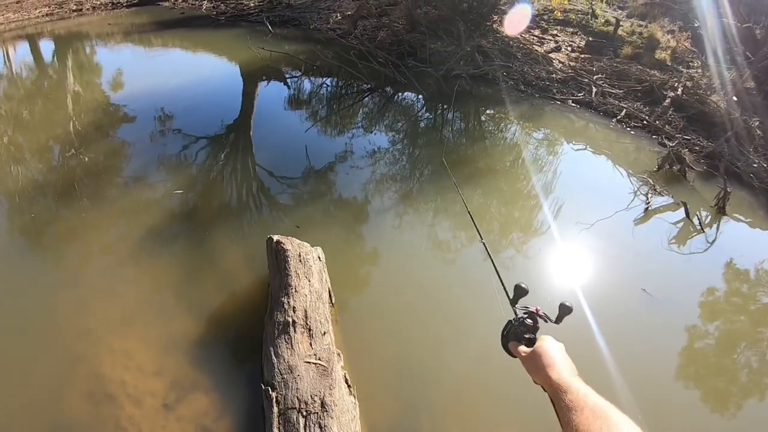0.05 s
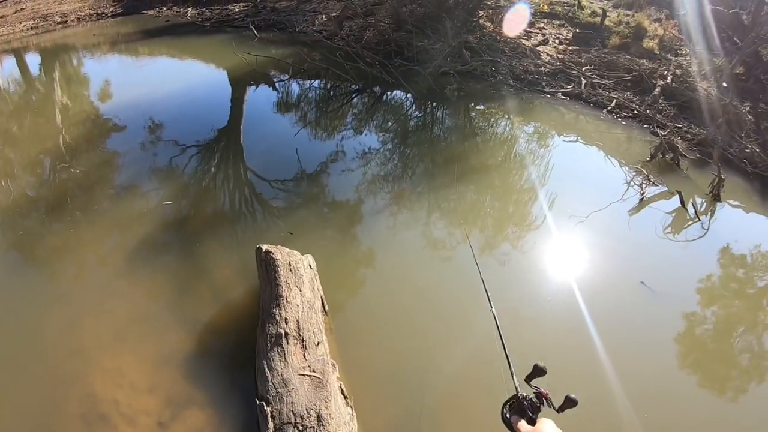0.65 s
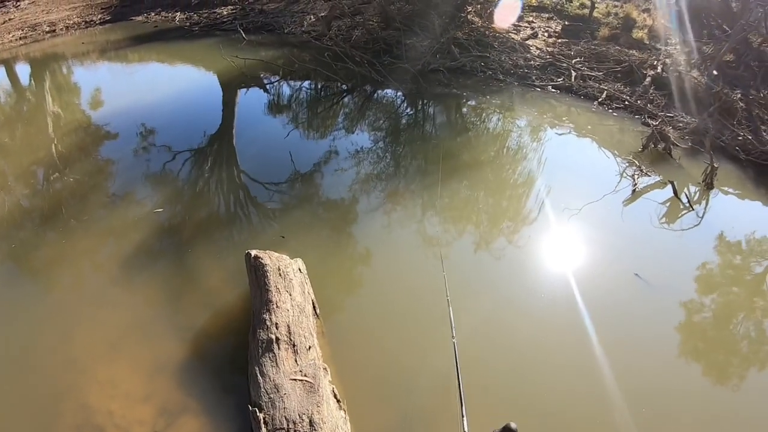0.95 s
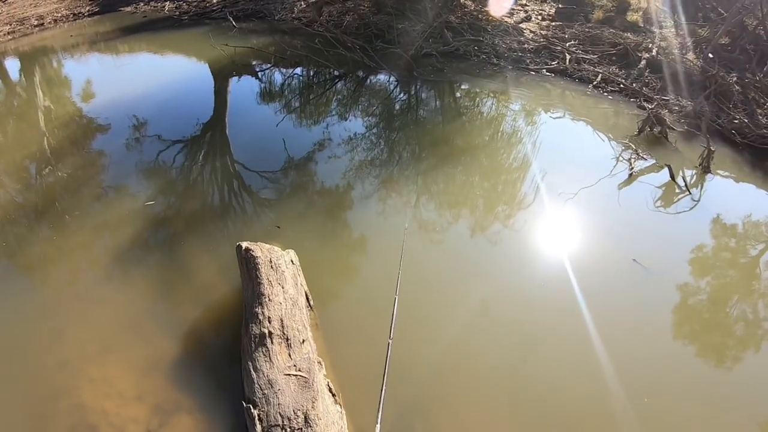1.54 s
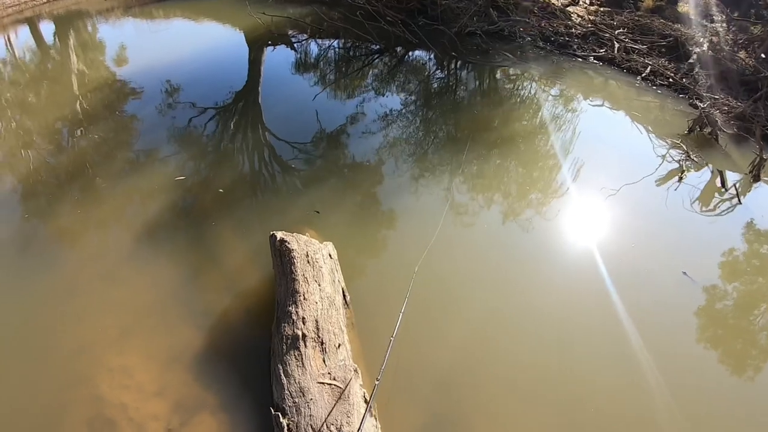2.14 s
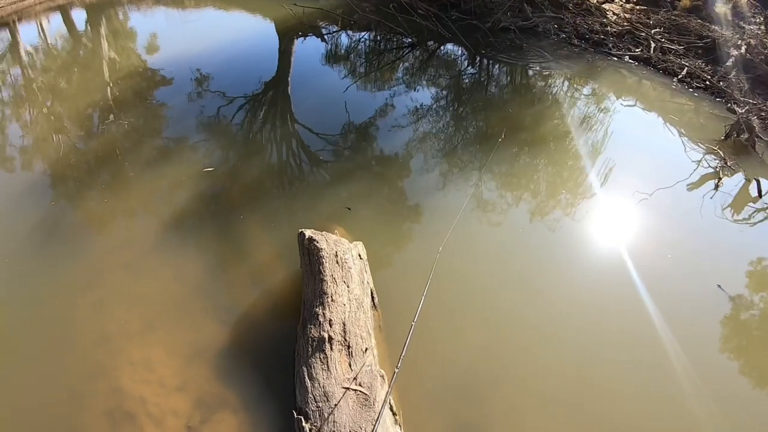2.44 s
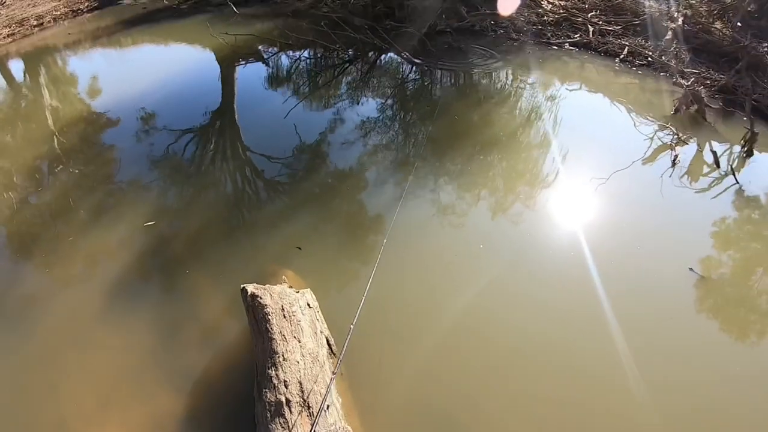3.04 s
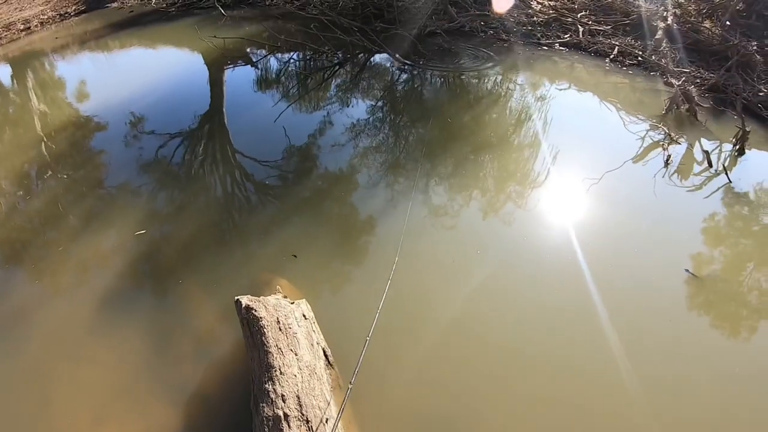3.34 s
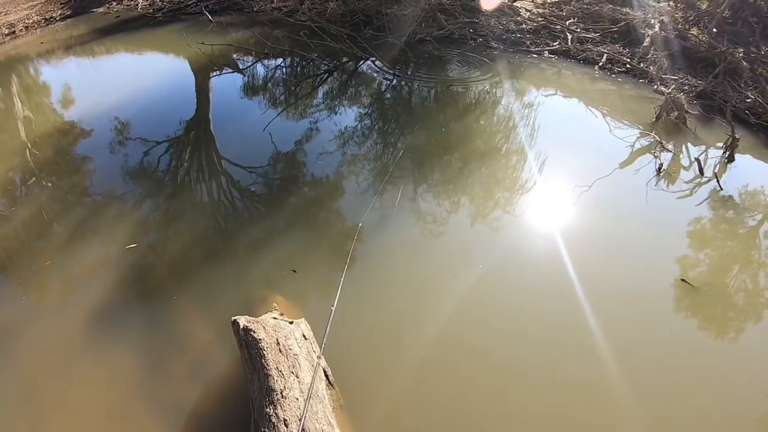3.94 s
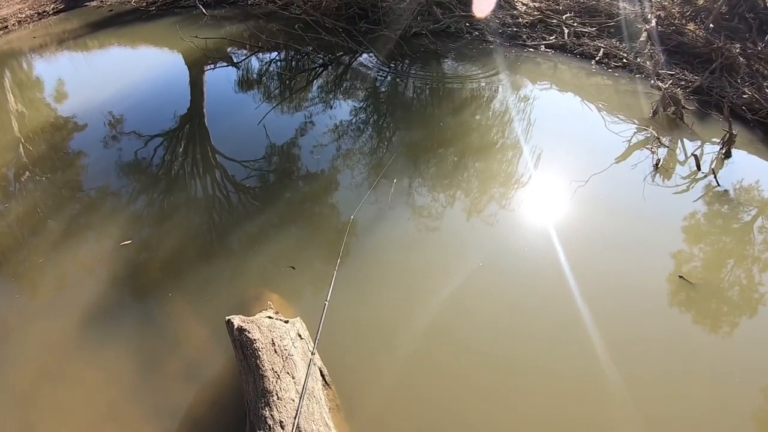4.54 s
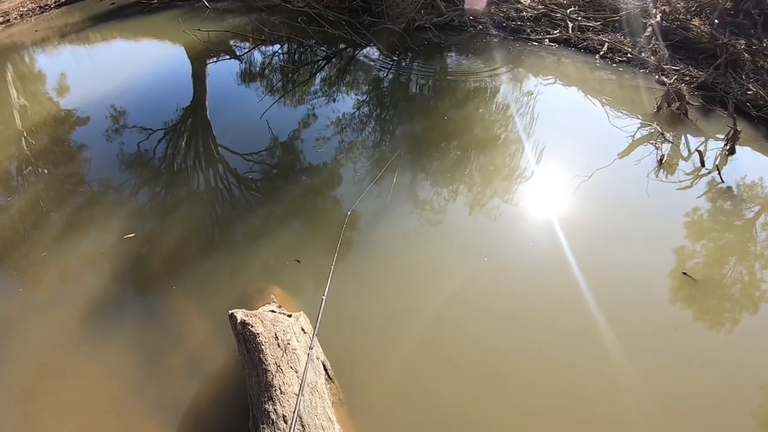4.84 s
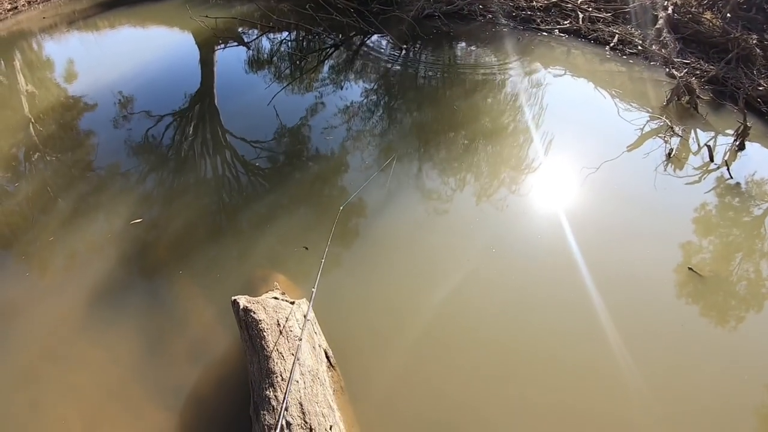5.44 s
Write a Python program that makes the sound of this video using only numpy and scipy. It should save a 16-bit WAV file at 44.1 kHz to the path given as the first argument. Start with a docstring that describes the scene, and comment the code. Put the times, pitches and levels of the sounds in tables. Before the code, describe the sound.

Raspy cockatoo-like screeches echo among riverside trees, with a soft plop in the water and one close snap of a fishing reel.

```python
"""Two harsh birds, most likely cockatoos, screech in turn over a still river, ahead and to the left.
Each screech is a train of uneven pulses in a throat with a few broad resonances.
First a far call falls away on the right and a lure plops into the water; later, close to the
microphones, the angler's reel snaps into gear. The near bank scatters the sound and the trees ring
with it, over soft handling bumps, a brief low hum and the faint wash of the bush."""
import sys
import numpy as np
from scipy import signal
from scipy.fft import rfft, irfft
from scipy.io import wavfile
from scipy.ndimage import map_coordinates

SR = 44100
rng = np.random.default_rng(int(sys.argv[2]) if len(sys.argv) > 2 else 0)


def unload_wav(signal):
    """Save mono or channel-first audio to the path in sys.argv[1] as 16-bit WAV at rate SR, clipped to [-1, 1]."""
    wavfile.write(
        sys.argv[1],
        SR,
        np.round(np.clip(np.atleast_2d(signal).T, -1, 1) * 32767).astype(np.int16),
    )


N = 250488

# One screech a row: start_s, length_s, attack_s, level_db, swell_db, rasp_db, upper_db, resonance_ratio,
# scoop_share, open_s, strain_peak_s, strain_db, fizz_db, whistle_hz, whistle_db, left_db
SCREECHES = [ (0.756, 0.62, 0.074, -24, 3.5, -7.5, 4, 1.02, 0.15, 0.089, 0.22, 5.5, -3, 2236, -0.5, -1),
             (1.505, 0.57, 0.2, -24.5, 3.5, -8.5, 1.5, 1.022, 0.14, 0.095, 0.28, 0.5, -2.5, 2220, -4.5, 0),
             (2.287, 0.56, 0.12, -22.5, 1, -10, 6, 0.98, 0.07, 0.08, 0.27, 4, -4, 2220, -6.5, 2.5),
             (3.025, 0.388, 0.18, -25.5, -3, -8, 3, 1.006, 0.1, 0.1, 0.25, 8, -3, 2240, -9.5, -0.5),
             (3.458, 0.43, 0.034, -28.5, 2, -9, 2.5, 1.013, 0.08, 0.049, 0.27, 2, -7.5, 2275, -15.5, 3),
             (3.752, 0.25, 0.087, -31.5, -2.5, -9.5, -3, 1.04, 0.05, 0.053, 0.093, -1, -0.5, 2180, -8, -1.5),
             (3.946, 0.120, 0.038, -26.5, 1, -11, 5.5, 1.02, 0.01, 0.031, 0.06, -3, -2.5, 2170, -3.5, -1),
             (4.019, 0.195, 0.039, -26.5, 4.5, -8.5, -4, 1.0, 0, 0.03, 0.13, -2, 0, 2120, -2.5, 0.5),
             (4.199, 0.35, 0.024, -28, 6.5, -10.5, 7, 1.034, 0.11, 0.033, 0.36, 4.5, -7, 2150, -11, 3.5),
             (4.45, 0.51, 0.084, -27, 3, -9.5, 3, 0.99, 0.04, 0.084, 0.27, 1.5, 1, 2150, -6, 1.5),
             (5.201, 0.56, 0.062, -27, 4.5, -9.5, 2.5, 0.98, 0.09, 0.062, 0.36, 1, -2.5, 2300, -11.5, 3.5),
             ]
def cockatoos():
    """Two birds trade screeches, one ahead of the microphones and one to the left."""
    out = np.zeros((2, N))
    for start_s, *shape, left_db in SCREECHES:
        for channel, sound in zip(out, at_microphones(screech(start_s, *shape), left_db)):
            add(channel, start_s, sound)
    return out


# The throat's broad resonances, before the beak shifts them: frequency_hz, level_db
THROAT = [(150, -65.5), (250, -37.5), (357, -37), (518, -28.5), (586, -30), (717, -26), (918, -21),
          (1090, -11.5), (1370, -15.5), (1650, -15.5), (1820, -13.5), (2090, -2.5), (2220, -0.5),
          (2630, -6), (3070, -3), (3640, -12.5), (4260, -8.5), (4820, -15.5), (5620, -16), (8950, -30),
          (10100, -40), (13200, -73.5), (22000, -120)]
def screech(start_s, length_s, attack_s, level_db, swell_db, rasp_db, upper_db, resonance_ratio,
            scoop_share, open_s, strain_peak_s, strain_db, fizz_db, whistle_hz, whistle_db,
            strain_width_s=0.21, close_s=0.04, droop_share=0.13, release_s=0.053, flutter_hz=16.07):
    """Resonances rise as the beak opens and sink as it shuts; mid-call strain adds brightness and rasp."""
    t = np.arange(0, length_s, 1 / SR)
    remaining_s = length_s - t
    slack_db = strain_db * (np.exp(-((t - strain_peak_s) / strain_width_s) ** 2) - 1)
    shut = scoop_share * np.exp(-t / open_s) + droop_share * np.exp(-remaining_s / close_s)
    pulses = syrinx(start_s + t)
    voice = coloured(pulses, THROAT) + gain_of(-65) * pulses
    # A nasal resonance and a fading whistle both ring more behind a shut beak.
    voice += gain_of(-15.5 + 26.5 * shut) * resonance(voice, hz=1100, width_hz=100)
    voice += gain_of(whistle_db - 11 * t + 26.5 * shut) * resonance(voice, whistle_hz, width_hz=194)
    speed = resonance_ratio - shut + 0.022 * drift(len(t), hz=14)
    voice = map_coordinates(voice, [np.cumsum(speed)], order=3, mode="mirror")  # all resonances move
    low = lowpass(voice, 2413, order=6)
    body = lowpass(voice, 3307, order=6)
    bright = lowpass(voice, 4900, order=3)
    # A shut beak muffles the upper resonance and the rasp; strain and effort are never quite steady.
    upper_gain = gain_of(upper_db + slack_db - 31 * shut + 1.3 * drift(len(t), flutter_hz))
    core = (unit_rms(low) + upper_gain * unit_rms(body - low)) / np.hypot(1, upper_gain)
    rasp = unit_rms(bright - body + gain_of(fizz_db) * (voice - bright))
    rasp *= gain_of(rasp_db + 0.31 * slack_db - 13 * shut + 1.3 * drift(len(t), flutter_hz))
    effort_db = level_db + swell_db * (t / length_s - 0.5) + 0.33 * slack_db
    effort_db -= 0.18 * drift(len(t), flutter_hz)
    fade = np.minimum(t / attack_s, 1) ** 0.74 * np.minimum(remaining_s / release_s, 1)
    return gain_of(effort_db) * fade * (core + rasp)


# The last screech locks into a clear note: time_s, pitch_hz, clear_share
CLEAR_NOTE = [(5.576, 457, 0.4), (5.614, 468.7, 0.73), (5.635, 467, 0.3), (5.659, 478, 0.55),
              (5.68, 468, 0.45)]
def syrinx(t, slap_hz=245, jitter=0.42, uneven_db=-0.5, steady_air=9.7):
    """Membranes slap unevenly, with air rushing between them, and briefly lock to a pitch."""
    haste = np.exp(jitter * drift(len(t), hz=300))
    cycles = np.cumsum(slap_hz * haste) / SR
    size = gain_of(uneven_db * np.clip(rng.standard_normal(len(t)), -2, 2))
    size /= np.sqrt(haste)  # pressure builds in a long gap
    slaps = np.diff(np.floor(cycles), prepend=0) * size
    air = (steady_air + np.exp(-2 * (cycles % 1))) * rng.standard_normal(len(t))
    harsh = unit_rms(unit_rms(slaps - slaps.mean()) + unit_rms(air))
    time_s, pitch_hz, clear_share = np.transpose(CLEAR_NOTE)
    clear = np.interp(t, time_s, clear_share, left=0)
    phase = 2 * np.pi * np.cumsum(np.interp(t, time_s, pitch_hz)) / SR
    note = sum(np.cos(k * phase) for k in range(1, 14)) * 2 * np.sqrt(pitch_hz.mean() / SR)
    return np.sqrt(1 - clear) * harsh + np.sqrt(clear) * note


def at_microphones(x, left_db, lag_samples_per_db=0.1957):
    """The nearer microphone hears the caller louder and a fraction of a sample sooner."""
    n = np.arange(len(x))
    return [gain_of(db) * map_coordinates(x, [n + lag_samples_per_db * db], order=3)
            for db in (left_db / 2, -left_db / 2)]


# The reel's ticks, then its snap into gear: start_s, level_db, treble_db
REEL_TICKS = [(0.030, -42, -9), (0.037, -37, 1), (0.053, -36, 11), (0.076, -46, 4), (0.234, -40, 7),
              (0.335, -42, 2), (0.353, -43, 4), (0.373, -44, 6), (2.2576, -23.5, -12), (2.2626, -15, 8),
              (2.2635, -16, 8), (2.2643, -11.5, 0), (2.2687, -20, -19), (2.2696, -19, -14)]
# Modes of its body: frequency_hz, level_db, t60_s
REEL_MODES = [(895, -7, 0.006), (1650, -6.5, 0.008), (2560, -2, 0.006), (3230, -3.5, 0.013),
              (4140, -6, 0.0055), (5700, -0.5, 0.0049), (6820, -2.5, 0.0046), (8620, -2.5, 0.0053),
              (11800, -30, 0.0036)]
# The scrape in each strike: frequency_hz, level_db
REEL_GRIT = [(100, 0), (800, 4), (3000, 2.5), (9000, -2), (11000, -14), (15000, -11)]
def reel(left_db=-4.5, hard_tick_db=-12, grit_decay_s=0.00075):
    """Pawl and gears strike a small, damped body, so close that each microphone hears its own grit."""
    out, t = np.zeros((2, N)), np.arange(SR // 20) / SR
    for start_s, level_db, treble_db in REEL_TICKS:
        ring = np.zeros(len(t))
        for hz, mode_db, t60_s in REEL_MODES:
            decay = gain_of(mode_db + treble_db * (hz > 5000) - 60 * t / t60_s)
            ring += rng.choice([-1, 1]) * decay * np.sin(2 * np.pi * hz * t)
        # Soft ticks carry less grit.
        grit_gain = 0.83 * gain_of(min(treble_db, 0) + 0.3 * (level_db - hard_tick_db))
        for channel in out:
            grit = coloured(rng.standard_normal(len(t)) * np.exp(-t / grit_decay_s), REEL_GRIT)
            add(channel, start_s, gain_of(level_db) * (ring / abs(ring).max() + grit_gain * grit))
    return panned(lowpass(out, 12000) - lowpass(out, 680), left_db)


# The lure landing in the river: start_s, level_db, pitch_hz, rise_per_s, t60_s, spray_gain
SPLASHES = [(0.418, -47, 3550, 1, 0.026, 1), (0.426, -45, 3090, 4, 0.05, 1),
            (0.441, -57, 1310, 5, 0.047, 0.58), (0.448, -49, 3540, -6, 0.075, 0.76),
            (0.457, -50.5, 1271, 5, 0.034, 0.8), (0.480, -49, 1516, 5, 0.022, 0.76),
            (0.483, -42, 720, -4, 0.066, 0.65), (0.49, -46, 2300, 4, 0.025, 0.4),
            (0.499, -38.5, 2620, 11, 0.018, 0.35), (0.51, -50, 1420, 18.5, 0.047, 0.2),
            (0.525, -50, 1950, 45, 0.04, 0.1), (0.575, -63, 2690, 11, 0.015, 0.7),
            (0.629, -48, 3200, 70, 0.029, 0.22), (0.673, -50.5, 1200, 30, 0.055, 0.45),
            (0.683, -49, 2300, 72.5, 0.04, 0), (0.688, -48, 1880, 6, 0.035, 0.5),
            (0.708, -45, 760, 6, 0.02, 0.04), (0.726, -50, 3070, 4, 0.024, 0.17)]
def lure(droplets_per_s=1500, spray_t60_s=0.057, attack_s=0.00063):
    """Each splash is a short-lived bubble that glides in pitch, with a brief spatter of droplets."""
    out, t = np.zeros(N), np.arange(SR // 16) / SR
    onset = 1 - np.exp(-t / attack_s)
    for start_s, level_db, pitch_hz, rise_per_s, t60_s, spray_gain in SPLASHES:
        bubble = np.sin(2 * np.pi * pitch_hz * (t + rise_per_s * t ** 2 / 2)) * gain_of(-60 * t / t60_s)
        droplets = rng.standard_normal(len(t)) * (rng.random(len(t)) < droplets_per_s / SR)
        spectrum = [(pitch_hz / 3, -20), (pitch_hz, 0), (5800, -8), (11000, -30), (16000, -45)]
        spatter = unit_rms(coloured(droplets, spectrum)) * gain_of(-60 * t / spray_t60_s)
        add(out, start_s, gain_of(level_db) * (bubble + spray_gain * spatter) * onset)
    return lowpass(out, 13000)


# The far bird's falling call: time_s, pitch_hz, level_db
FAR_CALL = [(0, 1250, -58), (.06, 1233, -55), (0.121, 1176, -58), (0.18, 1053, -52.5), (0.244, 1022, -50.5),
            (.28, 958, -61)]
# Its hoarseness, heard at a distance: frequency_hz, level_db
FAR_HOARSENESS = [(350, -62), (600, -30), (1080, -29.5), (1570, -21.5), (1720, -12.5), (2620, -15),
                  (3510, -20.5), (9000, -42.5), (11700, -74), (19800, -120)]
def far_bird(note_db=-5, waver=0.013, left_db=-6, release_s=0.012):
    """A hoarse cry far off to the right, with a falling note in it that gives way to its octave."""
    time_s, pitch_hz, level_db = np.transpose(FAR_CALL)
    t = np.arange(0, time_s[-1], 1 / SR)
    progress = t / t[-1]
    wavering_hz = np.interp(t, time_s, pitch_hz) * (1 + waver * drift(len(t), hz=306))
    phase = 2 * np.pi * np.cumsum(wavering_hz) / SR
    note = np.sin(phase) * (1 - progress ** 2) ** 2 + np.sin(2 * phase) * progress
    hoarse = coloured(rng.standard_normal(len(t)), FAR_HOARSENESS)
    cry = unit_rms(hoarse) + gain_of(note_db) * unit_rms(note)
    envelope = gain_of(np.interp(t, time_s, level_db)) * np.minimum((t[-1] - t) / release_s, 1)
    return panned(np.pad(cry * envelope, (0, N - len(t))), left_db)


# Decay among the trees: frequency_hz, t60_s
TREES_DECAY = [(300, 0.62), (1100, 1.65), (2700, 1.3), (5000, 1.56), (10000, 1), (14000, .35)]
# Tone of their answer: frequency_hz, gain_db
TREES_TONE = [(300, -6), (1100, -7), (1600, -6), (2100, -9.5), (2900, -6.5), (4200, -8), (9000, -5.5),
              (14000, -23)]
def trees(x):
    """The trees over the river answer with a long tail, partly alike at both microphones."""
    return reflections(x, TREES_DECAY, TREES_TONE, delay_s=0.02, common_gain=0.975, path_sets=6)


# Decay along the near bank: frequency_hz, t60_s
BANK_DECAY = [(300, 0.15), (3000, 0.06), (10000, 0.05)]
# Tone of its scatter: frequency_hz, gain_db
BANK_TONE = [(400, -3), (1100, 0), (3500, -10), (6000, -2), (10000, 6)]
def near_bank(x):
    """The bank beside the microphones throws a short, separate scatter at each."""
    return reflections(x, BANK_DECAY, BANK_TONE, delay_s=0.000985, common_gain=0, path_sets=20)


def reflections(x, decay, tone, delay_s, common_gain, path_sets, taps_per_s=6000):
    """Many small echoes, each band dying at its own speed; the paths change as the head moves."""
    out = np.zeros((2, N))
    position = np.linspace(0, path_sets - 1, N)
    for k in range(path_sets):
        taps = rng.choice([-1., 1.], (3, SR)) * (rng.random((3, SR)) < taps_per_s / SR)
        hz, t, bands = signal.stft(taps[:2] + common_gain * taps[2], SR, nperseg=256)
        fade = gain_of(-60 * t / curve_at(decay, hz)[:, None])
        fade /= np.sqrt((fade ** 2).mean(1, keepdims=True))
        tail = signal.istft(bands * fade * gain_of(curve_at(tone, hz))[:, None], SR, nperseg=256)[1]
        tail /= np.linalg.norm(taps[0]) * np.sqrt(1 + common_gain ** 2)
        tail = np.pad(tail, ((0, 0), (round(delay_s * SR), 0)))
        crossfade = np.cos(np.pi / 2 * np.clip(position - k, -1, 1))
        out += signal.fftconvolve(x * crossfade, tail, axes=1)[:, :N]
    return out


# Bumps at the microphones: start_s, peak_db, top_hz, length_s
BUMPS = [(0.711, -53, 600, 0.016), (1.161, -58, 45, 0.057), (1.68, -58.5, 50.57, 0.2),
         (2.208, -46, 614, 0.035), (2.265, -48, 500, 0.049), (2.57, -62, 50.4, 0.19),
         (2.711, -39, 750, 0.016), (4.025, -53, 250, 0.035)]
def handling_bumps():
    """Soft knocks of handling and puffs of air: dull swells of low noise that die quickly."""
    out, t = np.zeros(N), np.arange(SR // 2) / SR
    for start_s, peak_db, top_hz, length_s in BUMPS:
        age = t / (length_s / 4)
        band = signal.butter(2, [top_hz / 3, top_hz], "bandpass", fs=SR, output="sos")
        thud = signal.sosfilt(band, rng.standard_normal(len(t))) * age * np.exp(-age)
        add(out, start_s, gain_of(peak_db) * thud / abs(thud).max())
    return out


def hum(pitch_hz=285, level_db=-66, waver=0.017):
    """A faint low hum swells and fades."""
    swell = np.interp(np.arange(N) / SR, [1.85, 2.1, 2.3, 2.65], [0, 1, 1, 0])
    phase = 2 * np.pi * np.cumsum(pitch_hz * (1 + waver * drift(N, hz=120))) / SR
    return gain_of(level_db) * swell * np.sin(phase)


# The air of the riverside: frequency_hz, relative_db
BUSH_AIR = [(15, -54), (25, -11.5), (68, -14), (84, -2), (102, -21.5), (156, -2), (387, -12), (672, -12),
            (762, -0.5), (931, -9), (1460, -5.5), (1840, -15), (2360, -2), (4530, -15), (6440, -22),
            (8500, -19.5), (10100, -27), (13200, -56), (22000, -120)]
def bush_air(level_db=-59):
    """The faint steady wash of the bush, wide across both microphones."""
    common, left, right = rng.standard_normal((3, N))
    noise = 0.38 * common + 0.85 * np.array([left, right])
    spectrum = gain_of(curve_at(BUSH_AIR, np.fft.rfftfreq(N, 1 / SR)))
    return gain_of(level_db) * unit_rms(irfft(rfft(noise) * spectrum, N))


def gain_of(db):
    return 10 ** (np.asarray(db) / 20)


def unit_rms(x):
    return x / np.sqrt(np.mean(x ** 2) + 1e-20)


def panned(x, left_db):
    return x * gain_of([[left_db / 2], [-left_db / 2]])


def curve_at(points, hz):
    """Interpolates on a log-frequency axis."""
    point_hz, value = np.transpose(points)
    return np.interp(np.log(hz + 1), np.log(point_hz + 1), value)


def add(mix, start_s, sound):
    part = mix[max(round(start_s * SR), 0):][:len(sound)]
    part += sound[:len(part)]


def coloured(x, spectrum):
    """Causal filter from (frequency_hz, gain_db) points: a click rings after its start, never before."""
    gain_db = np.maximum(curve_at(spectrum, abs(np.fft.fftfreq(4096, 1 / SR))), -100)
    response = np.exp(np.conj(signal.hilbert(np.log(gain_of(gain_db)))))
    ring = np.fft.ifft(response).real[:2048]
    return signal.oaconvolve(x, ring)[:len(x)]


def lowpass(x, hz, order=2):
    return signal.sosfiltfilt(signal.butter(order, hz, fs=SR, output="sos"), x)


def resonance(x, hz, width_hz):
    return signal.lfilter(*signal.iirpeak(hz, hz / width_hz, fs=SR), x)


def drift(count, hz):
    """A smooth random wander of rms one that changes about hz times a second."""
    knots = rng.standard_normal(2048)
    return unit_rms(map_coordinates(knots, [np.arange(count) * hz / SR], order=2, mode="mirror"))


def scene():
    """The balance from the riverbank: each source trimmed, scattered nearby and answered by the trees."""
    calls = gain_of(-3) * cockatoos()
    far = far_bird()
    water = gain_of(1.5) * lure()
    tackle = gain_of(1.5) * reel()
    scatter = near_bank(calls + far + water + gain_of(-15) * tackle)
    echo = trees(calls + gain_of(4.5) * far + gain_of(-8) * water)
    return calls + far + water + tackle + scatter + echo + handling_bumps() + hum() + bush_air()


def record(dry, top_hz=15700):
    """The recorder's band limit."""
    band_limit = signal.firwin(511, top_hz, window=("kaiser", 9), fs=SR)
    return signal.oaconvolve(dry, band_limit[None], "same")


dry = scene()
out = record(dry)
unload_wav(out)
```